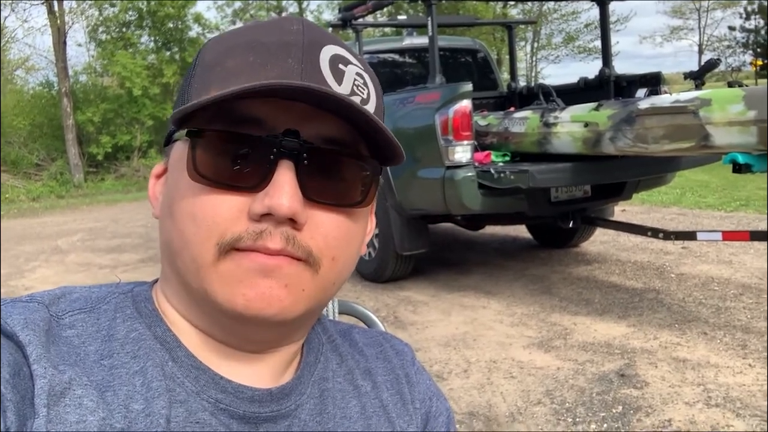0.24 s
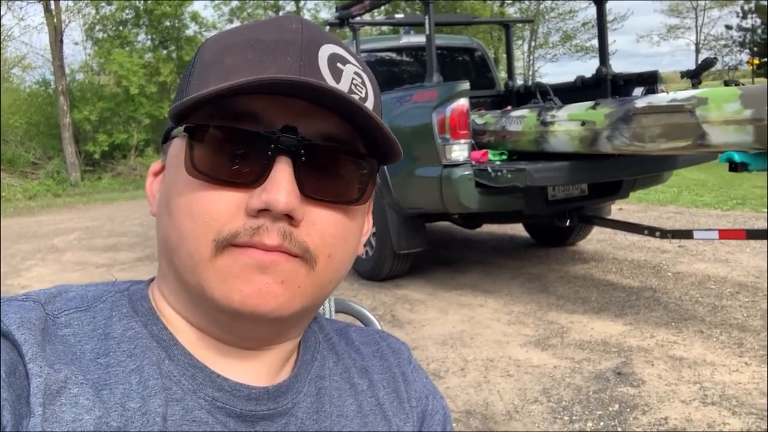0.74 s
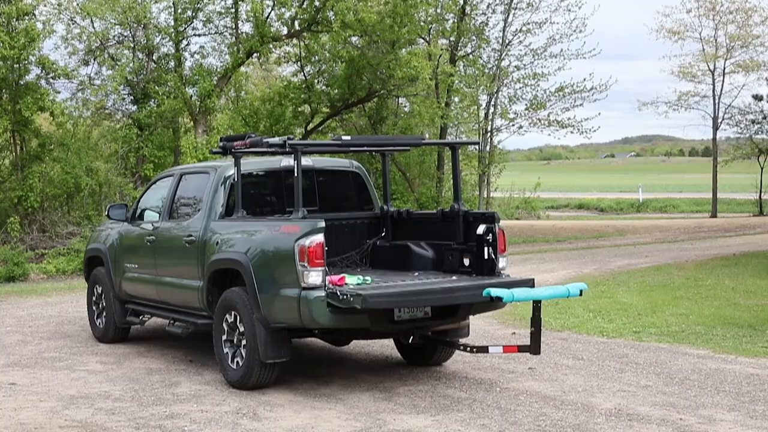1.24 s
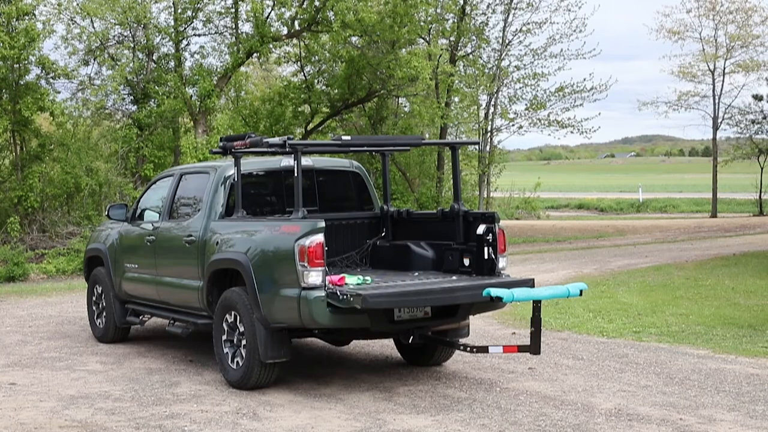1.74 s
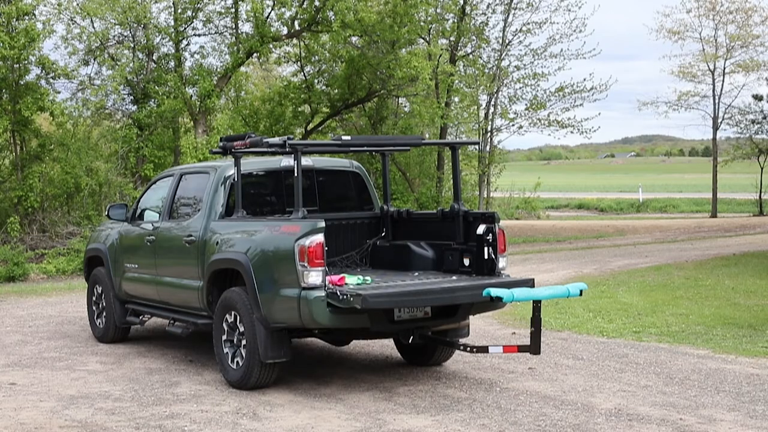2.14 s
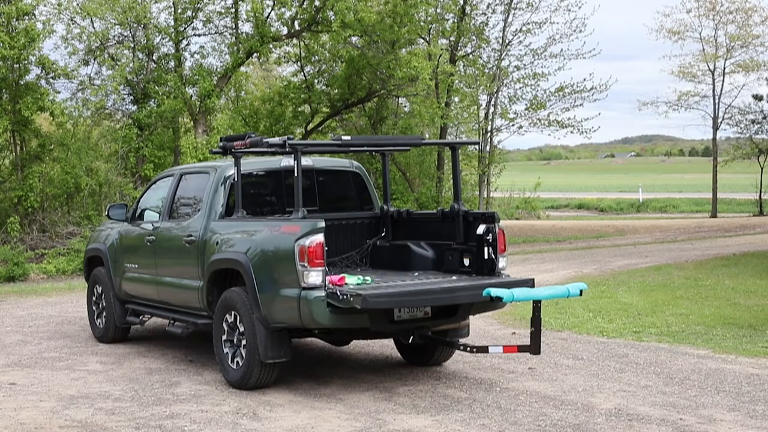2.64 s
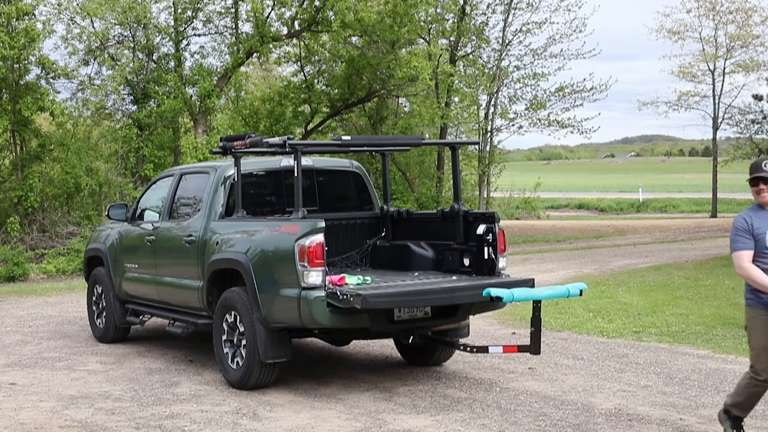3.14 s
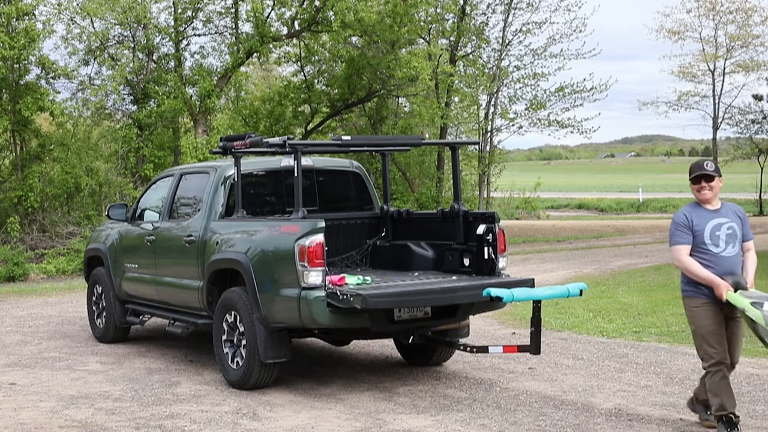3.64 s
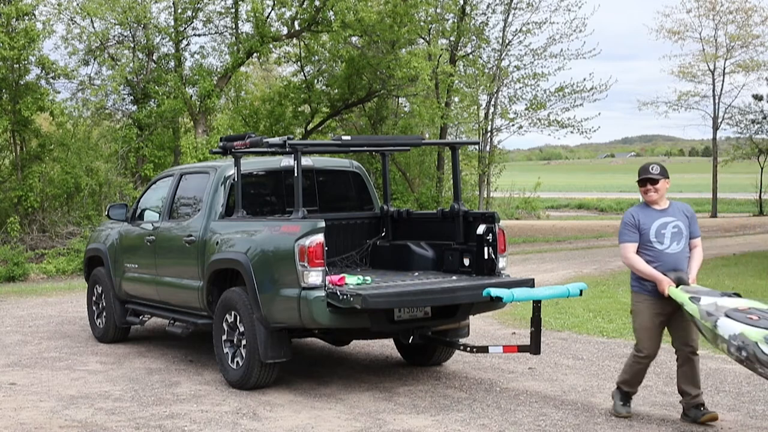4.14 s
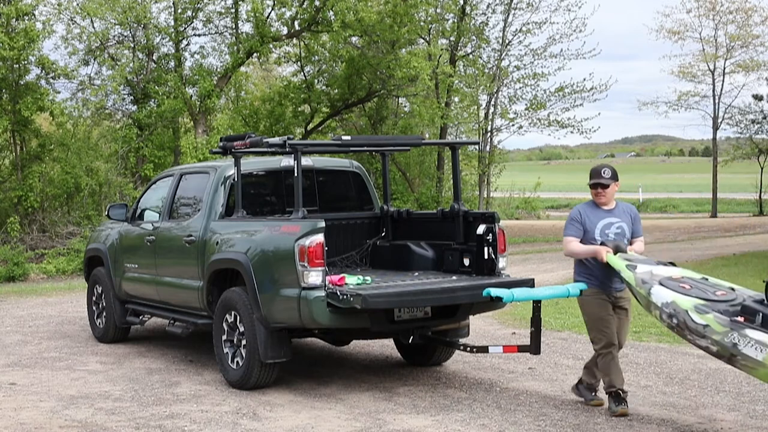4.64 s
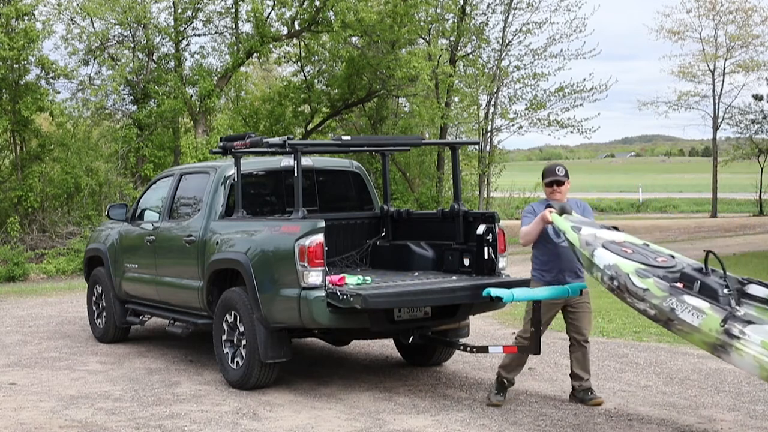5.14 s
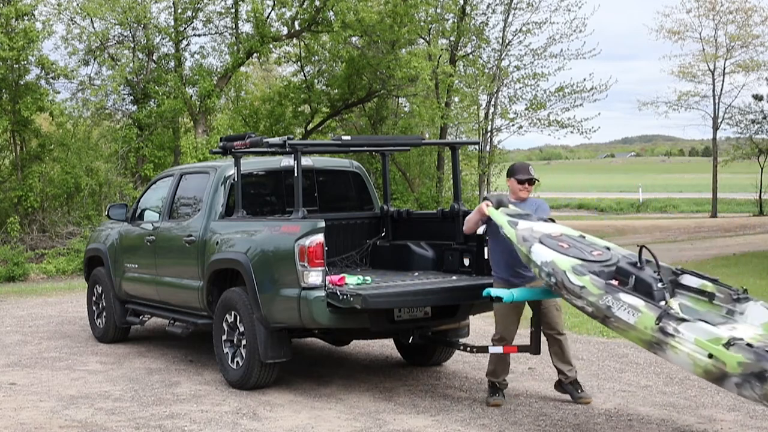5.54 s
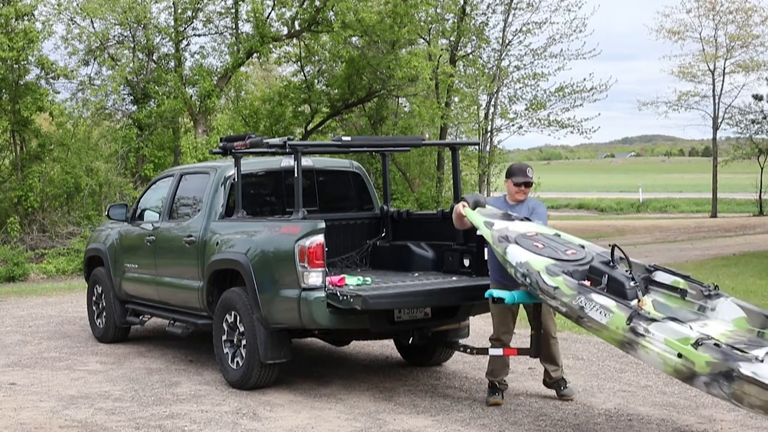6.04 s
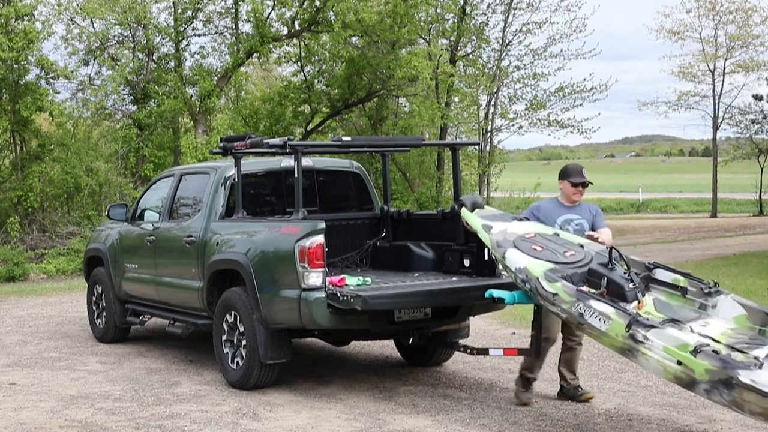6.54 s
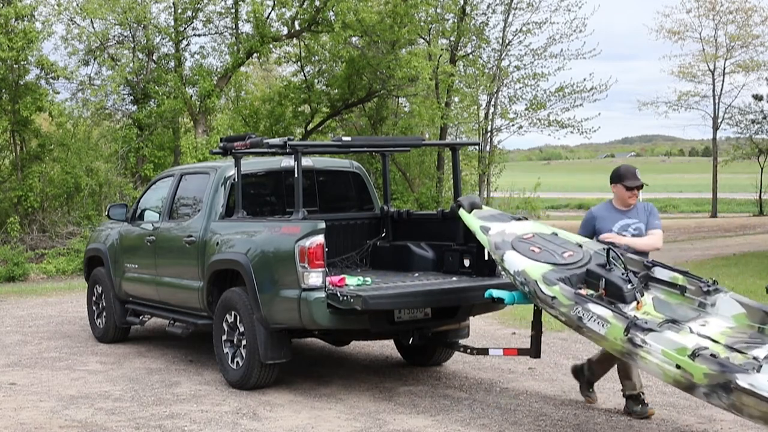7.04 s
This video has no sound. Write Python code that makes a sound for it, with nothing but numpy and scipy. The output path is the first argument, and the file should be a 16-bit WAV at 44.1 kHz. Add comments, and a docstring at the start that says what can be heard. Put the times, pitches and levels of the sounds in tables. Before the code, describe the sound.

From 0 to about 1 s it is very quiet: only a faint, wavering low hum. At 1 s the scene cuts abruptly to an open gravel yard with soft airy background, and a hollow plastic kayak is already being dragged. At first deep boom and dull bumps dominate, with a strong crunch at 1.4 s. The pull surges and slackens; from 2.4 s stones snap more sharply, and from 3.5 to 5.7 s the grinding is dense, loud, bright and close, with brief hull groans near 3.9, 5.0 and 5.65 s and hard cracks at 4.7 and 5.6 s. At 5.7 s the stern skids in a sandy spray, fading by 5.95 s. Then soft shoe scuffs and far, quick bird chirps from 6.2 s. A small click at 6.89 s leads into a hollow double knock at 6.9 and 6.94 s, rattling and bouncing faintly; shoe and bird traces follow to the end.

```python
"""A gravel yard, entered abruptly after a much quieter spot with a low hum: a plastic kayak is dragged bow first.
Grit and stones are random trains of fractures filtered by hull resonances; the hollow hull adds boom and groans.
The stern skids to rest as fading sand noise, shoes shuffle as short bursts of filtered grains, and the bow touches
a truck bed with a click of such grains, then lands in a double knock of decaying modes. A far bird sings in
gliding tones."""
import sys
import numpy as np
from scipy import signal
from scipy.fft import rfft, irfft
from scipy.io import wavfile
from scipy.ndimage import uniform_filter1d

SR = 44100
rng = np.random.default_rng(int(sys.argv[2]) if len(sys.argv) > 2 else 0)


def log_audio(samples):
    """Write samples as a 16-bit WAV file to the path given in sys.argv[1]."""
    # one column per channel
    frames = np.atleast_2d(samples).T
    # limit to full scale, then quantise
    limited = np.clip(frames, -1, 1)
    pcm = np.round(limited * 32767).astype(np.int16)
    wavfile.write(sys.argv[1], SR, pcm)


N = 321930  # samples
T = np.arange(N) / SR  # s
YARD_FROM_S = .972  # the quiet spot ends, the yard begins


def amp(db):
    """Decibel law: level to linear amplitude."""
    return 10 ** (np.asarray(db) / 20)


def evened(x):
    """Normalization to unit root mean square."""
    return x / np.sqrt(np.mean(x ** 2) + 1e-20)


def blow(x):
    """Energy normalization: the energy of 10 ms at unit level."""
    return x * np.sqrt(.01 * SR / (np.sum(x ** 2) + 1e-20))


def read(points, hz):
    """Spectral interpolation on a logarithmic frequency axis."""
    f, value = np.transpose(points)
    return np.interp(np.log(hz + 1), np.log(f + 1), value)


def add(mix, s, sound):
    """Superposition: adds a sound to the mix from time s on."""
    part = mix[round(s * SR):][:len(sound)]
    part += sound[:len(part)]


def wander(hz):
    """Low-pass random process: unit-size noise rolled off steeply above hz."""
    rolloff = 1 + (np.fft.rfftfreq(N, 1 / SR) / hz) ** 4
    return evened(irfft(rfft(rng.standard_normal(N)) / rolloff, N))


def noise(spectrum):
    """Spectral shaping: steady noise of a given colour at unit level."""
    colour = amp(read(spectrum, np.fft.rfftfreq(N, 1 / SR)))
    return evened(irfft(rfft(rng.standard_normal(N)) * colour, N))


def response(spectrum, resonances=(), size=4096):
    """Minimum-phase principle: a causal impulse response from a colour plus resonances (f, width, lift)."""
    hz = abs(np.fft.fftfreq(size, 1 / SR))
    db = read(spectrum, hz)
    db = db + sum(lift / (1 + (2 * (hz - f) / width) ** 2) for f, width, lift in resonances)
    log_spectrum = signal.hilbert(np.log(amp(db))).conj()  # phase follows from the log magnitude
    return np.fft.ifft(np.exp(log_spectrum)).real[:size // 2]


def registers(x):
    """Band splitting at 1200 and 5000 Hz: body, crunch and fizz, each at unit level."""
    hz = np.fft.rfftfreq(len(x), 1 / SR)
    low = 1 / (1 + (hz / 1200) ** 10)
    high = 1 / (1 + (5000 / (hz + 1)) ** 10)
    return [evened(irfft(rfft(x) * share, len(x))) for share in (low, 1 - low - high, high)]


def grains(count, per_s, spread_db):
    """Random impulse train: sparse clicks of either sign, most small and a few large."""
    chance, size, sign = rng.random((3, count))
    steps_up = np.minimum(-np.log(1 - size), 4)
    return (chance < per_s / SR) * np.sign(sign - .5) * amp(spread_db * steps_up)


def scatter(x, t60, wet_db, count=12000):
    """Diffuse reflection: ground, truck and trees return a short, thin exponential tail."""
    t = np.arange(count) / SR
    taps = grains(count, per_s=2600, spread_db=15.0) * amp(-60 * t / t60) * (t > .003)
    return x + amp(wet_db) * signal.oaconvolve(x, taps / np.linalg.norm(taps))[:N]


# noise colour of the quiet spot: (f/Hz, relative density/dB)
QUIET_COLOUR = [(20, 0), (45, -34), (70, 8.5), (100, -10), (150, -12.5), (290, -18.5), (500, -33.5),
                (760, -38), (1500, -44), (4000, -47.5), (16000, -62)]
# noise colour of the open air in the yard: (f/Hz, relative density/dB)
AIR_COLOUR = [(20, -18), (50, 6.5), (110, 8), (200, 1), (450, -4), (1000, -8), (1500, -6.5), (3500, -13),
              (5000, -20.5), (8000, -19.5), (16000, -26)]
# course of the low hum: (t/s, level/dB)
HUM_LEVEL = [(0.0, -49), (0.082, -60), (0.11, -61), (0.15, -52), (0.234, -46), (0.272, -55), (0.39, -46),
             (0.425, -62), (0.46, -55), (0.508, -49), (0.654, -51.5), (0.902, -44.5), (0.96, -56)]
QUIET_DB, AIR_DB, HUM_HZ = -58.5, -50.5, 64.6


def background(drift_hz=5.6):
    """Frequency-modulated tone and coloured noise: a wavering hum in the quiet spot, then the yard's open air."""
    hum = evened(np.sin(2 * np.pi * np.cumsum(HUM_HZ + wander(drift_hz)) / SR))
    hum = hum * amp(np.interp(T, *np.transpose(HUM_LEVEL)))
    quiet = hum + amp(QUIET_DB) * noise(QUIET_COLOUR)
    yard = amp(AIR_DB) * noise(AIR_COLOUR) * amp(wander(9.1))
    return np.where(T < YARD_FROM_S, quiet, yard)


# bird syllables: (t/s, length/s, nominal start f/Hz, nominal end f/Hz, peak level/dB)
SYLLABLES = [(.51, .045, 2500, 3150, -84), (0.587, 0.15, 1200, 1340, -87), (0.887, .065, 2750, 3140, -79),
             (6.17, .026, 3410, 4150, -51.5), (6.247, 0.029, 6000, 3300, -57),
             (6.312, .028, 3350, 4100, -52), (6.395, 0.027, 6100, 3350, -59),
             (6.462, .028, 3300, 4000, -50), (6.534, 0.019, 4100, 2880, -51),
             (6.634, 0.022, 4100, 2900, -49), (6.739, 0.018, 4050, 2900, -51),
             (6.783, .015, 7300, 5500, -51), (7.1, .018, 3760, 3720, -52), (7.126, 0.016, 4100, 2850, -52),
             (7.2, 0.024, 2900, 3360, -54), (7.24, 0.016, 3400, 3630, -63), (7.265, .018, 4220, 2900, -51)]


def bird(waver=0.012, arch_hz=90):
    """Frequency glide: a far songbird slurs near-pure, slightly arched tones up and down."""
    out, unsteady = np.zeros(N), 1 + waver * wander(250)
    for s, length, start_hz, end_hz, db in SYLLABLES:
        u = np.linspace(0, 1, int(length * SR))
        arch = np.sin(np.pi * u)
        hz = start_hz + (end_hz - start_hz) * u + arch_hz * arch
        hz = hz * unsteady[int(s * SR) - len(u):][:len(u)]
        add(out, s, amp(db) * arch * np.sin(2 * np.pi * np.cumsum(hz) / SR))
    return out


# gravel under a rubber sole: (f/Hz, level/dB)
SOLE_COLOUR = [(100, -4), (350, 8.5), (600, 12), (900, 4), (1400, -2), (2100, -1.5), (2700, -4.5),
               (3800, -6.5), (5000, -10), (7500, -9), (11000, -20), (16000, -28)]
# shoes on gravel, and at 6.887 s the click of the bow's first touch on the truck:
# (t/s, crunch level/dB, body re crunch/dB, fizz re crunch/dB, time to peak/s, resonance f/Hz)
SCUFFS_AND_TOUCH = [(6.028, -46.5, 1.5, -9, 0.01, 2260), (6.112, -46, -3, -5, .003, 3040),
                    (6.118, -49, -4, -10, 0.012, 3000), (6.323, -46.5, -13, -15, 0.021, 1750),
                    (6.338, -46, -14, -22, 0.0016, 1670), (6.385, -54, -14, -10, 0.026, 1600),
                    (6.423, -42.5, -9, -22, 0.0024, 1400), (6.458, -41, -12, -19, 0.002, 1900),
                    (6.48, -50.5, -11, -9, 0.013, 1900), (6.664, -47.5, -10, -7, 0.0025, 3300),
                    (6.68, -50, 0, -8, 0.025, 1450), (6.719, -46.5, -8, -6, 0.0054, 3600),
                    (6.765, -43.5, -0.5, -15, 0.0041, 1550), (6.79, -49.5, -3, -15, 0.008, 1550),
                    (6.829, -42, 3.5, -13, 0.003, 2010), (6.846, -45, -8, -17, 0.0027, 1730),
                    (6.857, -38, -9, -17, 0.0024, 3000), (6.8866, -33, -12, -21, .0007, 2000),
                    (7.03, -44.5, -11, -17, 0.023, 2200)]


def steps_and_first_touch(resonance_db=8, resonance_width=0.61, count=18000):
    """Granular friction: soles scuff gravel and click stones; one such burst is the bow's first touch on the truck."""
    out, t = np.zeros(N), np.arange(count) / SR
    for s, db, body_db, fizz_db, peak_s, hz in SCUFFS_AND_TOUCH:
        colour = response(SOLE_COLOUR, [(hz, resonance_width * hz, resonance_db)])
        clicks = grains(count, per_s=2600, spread_db=4.5)
        parts = registers(signal.fftconvolve(clicks, colour)[:count])
        u = t / peak_s
        burst = sum(p * amp(db + tilt) for p, tilt in zip(parts, (body_db, 0, fizz_db)))
        add(out, s, u * np.exp(1 - u) * burst)
    return out


# modes of the bow on the truck bed: (nominal f/Hz, relative level/dB, 60 dB decay as share of ring length)
BOW_MODES = [(227, -9, 0.94), (328, -9.5, 2.1), (371.5, -2.5, 1.8), (403, -6.5, 1.1), (510, -4, 0.4),
             (575, 2, 0.54), (617, 3, 0.65), (677, -6, 0.58), (830, 0, 0.39), (920, -22, 0.37),
             (1406, -16, 0.86), (1470, -14, 0.57), (1880, -13, .4), (2800, -11, .3)]
# crack of plastic on the truck: (f/Hz, level/dB)
CRACK_COLOUR = [(200, -17), (700, 5.5), (900, -1), (1020, -9), (1250, -4), (1500, -1), (2100, 1),
                (2800, -2), (3600, -6.5), (4300, -7), (5100, -14), (7400, -11.5), (9000, -14.5),
                (15000, -21)]
# blows on the truck: the bow's landings and bounces, and fainter rattling knocks among them: (t/s, ring level
# over 10 ms/dB, crack re ring/dB, ring length/s), before the high-pass
KNOCKS_AND_RATTLES = [(6.8977, -19, -5.5, 0.066), (6.9136, -27, -7, .1), (6.928, -32, -9, 0.064),
                      (6.9352, -15.5, -9.5, 0.09), (6.954, -35, -15, 0.06), (6.9644, -29, -24, 0.08),
                      (6.983, -41, -12, 0.054), (7.04, -34.5, -10, 0.065), (7.0655, -34.5, -10.5, 0.1),
                      (7.092, -44, -10, 0.074)]


def knocks(crack_s=0.0012, rattle_db=-26, rattle_s=0.057, travel_s=0.0013, detune=.012,
           chatter_db=2.5, chatter_hz=80, punch_db=2, punch_s=0.011, count=12000):
    """Modal impact: the bow lands and bounces amid fainter rattling knocks, each a crack, a chattering hollow
    ring and a rattle of fittings."""
    out, t, colour = np.zeros(N), np.arange(count) / SR, response(CRACK_COLOUR)
    hz, level, share = np.transpose(BOW_MODES)[:, :, None]
    chatter = amp(chatter_db * wander(chatter_hz))
    for s, db, crack_db, ring_s in KNOCKS_AND_RATTLES:
        shifted = hz * (1 + detune * rng.uniform(-1.1, 1, hz.shape))
        phase = rng.uniform(-1, 1, hz.shape)
        modes = amp(level - 60 * t / (share * ring_s)) * np.sin(2 * np.pi * shifted * t + phase)
        ring = modes.sum(0) * (1 - np.exp(-(t / travel_s) ** 2))  # bending waves take a moment to spread
        ring = ring * np.resize(chatter[round(s * SR):], count)
        ring = ring * amp(punch_db * np.exp(-t / punch_s))  # boosted at the contact
        decay = np.exp(-t / crack_s) + amp(rattle_db) * np.exp(-t / rattle_s)
        crunch = grains(count, per_s=8700, spread_db=1.0) * decay
        crack = blow(signal.fftconvolve(crunch, colour)[:count])
        add(out, s, amp(db) * (blow(ring) + amp(crack_db) * crack))
    return signal.sosfilt(signal.butter(2, 200, "high", fs=SR, output="sos"), out)


# sand under the sliding stern: (f/Hz, level/dB)
SAND_COLOUR = [(100, -0.5), (400, 4), (490, 10), (720, 0), (950, 3.5), (1150, 0), (1500, -6), (2250, 1.5),
               (2700, -6.5), (3200, -1.5), (4200, -14.5), (7500, -19), (10000, -23.5), (13000, -35),
               (16000, -42)]
SKID_S, SKID_STOP_S, SKID_RISE_S = 5.705, 5.925, 0.004
SKID_EASE_DB_PER_S, SKID_STOP_DB_PER_S = 61, 200  # the second adds to the first once the stern stops


def skid(level_db=-23.5, body_db=-6.5, fizz_db=-13, spray_db=11, spray_s=0.053,
         trickle_db=-53, trickle_db_per_s=20):
    """Sliding friction: the stern slews sideways in a bright spray of sand, stops, and the last grains trickle."""
    age = np.maximum(T - SKID_S, 0)
    stopped = np.maximum(T - SKID_STOP_S, 0)
    slide = amp(level_db - SKID_EASE_DB_PER_S * age - SKID_STOP_DB_PER_S * stopped)
    trickle = amp(trickle_db - trickle_db_per_s * age)
    level = np.minimum(age / SKID_RISE_S, 1) * np.hypot(slide, trickle)
    clicks = grains(N, per_s=6000, spread_db=2.0)
    body, crunch, fizz = registers(signal.oaconvolve(clicks, response(SAND_COLOUR))[:N])
    spray = amp(fizz_db + spray_db * np.exp(-age / spray_s))
    return level * (amp(body_db) * body + crunch + spray * fizz)


# pull on the stern, surging and slackening with the walk: (t/s, effort/dB)
PULL_EFFORT = [(.97, -17), (1.15, -4), (1.29, -4.5), (1.43, 6), (1.64, -5.5), (1.79, 1.5), (1.94, -1),
               (2.14, 1.5), (2.3, -3), (2.45, 1), (2.58, -3.5), (2.92, -3.5), (3.1, 1.5), (3.3, -1.5),
               (3.55, -1.5), (3.63, 3.5), (3.8, 0.5), (4.32, 1), (4.55, 2.5), (4.64, -6.5), (4.73, -1),
               (5.41, -2.5), (5.57, 0), (5.7, -4.5)]
# laws of the registers: (level at the yard's start and 0 dB effort/dB, growth/(dB/s), gain/(dB per dB of effort))
BODY = (-39, -0.2, 0.95)
CRUNCH = (-50, 2.82, 1.34)
FIZZ = (-64.5, 3.77, 0.98)


def drag_db(s, law):
    """Linear level law: each register follows the pull; crunch and fizz grow as the stern nears."""
    start_db, db_per_s, follow = law
    effort_db = np.interp(s, *np.transpose(PULL_EFFORT), left=-150)
    return start_db + db_per_s * (s - YARD_FROM_S) + follow * effort_db


# low boom of the hull: (f/Hz, level/dB)
BOOM_COLOUR = [(20, -14), (31, -25), (45, -4), (62, -8), (85, 0.5), (108, 2.5), (135, -1.5), (180, -2.5),
               (220, 1), (270, -3), (330, -5.5), (400, -7), (520, -30), (1200, -62)]
# level law of the boom: (level at start/dB, growth/(dB/s), gain/(dB per dB of effort))
BOOM_FOLLOW = (-31, -0.58, 1)
# bumps from the ground or handling: (t/s, peak level before the thud and ring gains/dB, nominal panel f/Hz)
HULL_BUMPS = [(1.15, -28.5, 192), (1.332, -28, 290), (1.417, -19, 179), (1.434, -17, 249.3),
              (1.704, -25, 114), (1.803, -22.5, 253.4), (1.982, -32, 303), (2.075, -28.5, 312),
              (2.109, -23.5, 120), (2.175, -26, 185), (2.403, -27, 120), (2.743, -30, 109),
              (3.098, -24.5, 241), (3.157, -27.5, 374), (3.236, -27.5, 300), (3.391, -25.5, 325),
              (3.444, -25, 265), (3.671, -21.5, 250), (3.78, -28, 301), (4.089, -24, 226), (4.17, -33, 238),
              (4.238, -34, 110), (4.369, -24.5, 356), (4.482, -28, 291), (4.613, -25.5, 259),
              (4.695, -21, 113), (4.769, -26.5, 252), (5, -30, 236), (5.099, -34, 152), (5.448, -25.5, 215),
              (5.607, -25, 369), (6.725, -40, 201), (6.752, -37, 166)]
BUMP_RISE_S = 0.012  # time for the boom to swell after a bump


def rumble(lump_db=1.2, lump_hz=27, thud_db=-4.0, ring_db=-3.5, glide=0.09, rest_s=5.82,
           fade_db_per_s=100, deep_hz=55, deep_db=5.0, deep_db_per_s=-3.0):
    """Forced cavity resonance: the hull booms with the pull, bumps ring panels, the deepest boom fades as it lifts."""
    fade_db = fade_db_per_s * np.maximum(T - rest_s, 0)
    power = amp(drag_db(T, BOOM_FOLLOW) + lump_db * wander(lump_hz) - fade_db) ** 2
    rings, t = np.zeros(N), np.arange(SR // 4) / SR
    u = t / BUMP_RISE_S
    for s, db, hz in HULL_BUMPS:
        shape = amp(db) * u * np.exp(1 - u)
        add(power, s, (amp(thud_db) * shape) ** 2)
        falling_hz = hz * (1 + glide * (np.exp(-u / 2) - .5))
        turns = np.cumsum(falling_hz) / SR + rng.random()
        add(rings, s, amp(ring_db) * shape * np.sqrt(2) * np.sin(2 * np.pi * turns))
    boom = noise(BOOM_COLOUR)
    deep = irfft(rfft(boom) / (1 + (np.fft.rfftfreq(N, 1 / SR) / deep_hz) ** 10), N)
    deep_gain = amp(deep_db + deep_db_per_s * (T - YARD_FROM_S))
    return (boom + deep * (deep_gain - 1)) * np.sqrt(power) + rings


# groans of the hull: (t/s, length/s, middle f/Hz, peak level of the fundamental/dB)
HULL_GROANS = [(3.904, 0.019, 364, -26), (4.976, 0.025, 342, -26.5), (5.649, 0.027, 376, -24)]


def groans(sag=0.054, overtone_db=-10, count=3):
    """Stick-slip oscillation: the plastic groans for a few cycles, three harmonics sagging in pitch."""
    out = np.zeros(N)
    for s, length, hz, db in HULL_GROANS:
        u = np.linspace(0, 1, int(length * SR))
        phase = 2 * np.pi * np.cumsum(hz * (1 + sag * (.5 - u))) / SR
        tone = sum(amp(overtone_db * k) * np.sin((k + 1) * phase) for k in range(count))
        add(out, s, amp(db) * np.sqrt(abs(np.sin(np.pi * u))) * tone)
    return out


def grit(per_s=130, spread_db=3.0, over_db=-2.5, db_per_s=-1.0, low_hz=1500, high_hz=9500,
         tilt_db=-18, cycles=3.6, count=30):
    """Damped oscillation: loose grit ticks stone on stone at thirty pitches, the higher the fainter."""
    out, t = np.zeros(N), np.arange(SR // 100) / SR
    for place in np.linspace(0, 1, count):
        turns = low_hz * (high_hz / low_hz) ** place * t
        tick = np.exp(-turns / cycles) * (1 - np.exp(-2 * turns)) * np.sin(2 * np.pi * turns)
        clicks = grains(N, per_s / count, spread_db)
        out += amp(tilt_db * place) * signal.oaconvolve(clicks, evened(tick))[:N]
    level_db = drag_db(T, CRUNCH) + over_db + db_per_s * (T - YARD_FROM_S)
    return evened(out) * amp(level_db) * (T < SKID_S)


# colour of a stone's push on the hull: (f/Hz, level/dB)
PUSH_COLOUR = [(35, -42), (120, -1), (350, -1.5), (600, 0.5), (930, -2.5), (1180, -4.5), (1650, 0.5),
               (2500, 7.5), (3200, 4), (3700, -4.5), (5600, -16), (8300, -16.5), (10000, -25),
               (12000, -28.5), (16000, -38)]
# resonances and hollows of the hull: (nominal f/Hz, width/Hz, lift at full load/dB)
HULL_MODES = [(363, 76, 4), (503, 240, -7.5), (678, 170, 2), (748, 123, 7.5), (1130, 370, -4.5),
              (1904, 160, 11.5), (2280, 86, 2), (2360, 190, 6), (3080, 350, 6.5), (4160, 650, 6.5),
              (4900, 98, 7), (6880, 780, 3.5), (10200, 170, 9)]
# weight on the stern as the bow is raised, bringing out the resonances: (t/s, share, pitch factor of low modes)
STERN_LOAD = [(1, 0.4, 1.39), (2.1, 0.4, 1.19), (3.2, 0.72, 1.46), (3.8, 0.9, 1.17), (4.2, 0.9, 0.954),
              (4.7, 0.85, 0.86), (5.7, 0.64, 0.83)]


def contact(s, ring_hz, tick_hz, detune=0.035, ring_width_hz=300, tick_width_hz=900, count=5):
    """Driving-point response: shifted hull modes, one ringing panel, the stone's tick and random tints."""
    uneven_db, tint_db, tint_width, ring_db, tick_db = 3.5, 6, .15, 8, 7.5
    times, *columns = np.transpose(STERN_LOAD)
    load, stiffness = (np.interp(s, times, c) for c in columns)
    hz, width, lift = np.transpose(HULL_MODES)
    higher, louder = rng.uniform(-1.18, 1, (2, len(hz)))
    low_panel = (hz > 430) & (hz < 1000)  # only these modes change pitch with the load
    hz = hz * np.where(low_panel, stiffness, 1) * (1 + detune * higher)
    modes = [*zip(hz, width, load * lift + uneven_db * louder)]
    modes += [(ring_hz, ring_width_hz, ring_db), (tick_hz, tick_width_hz, tick_db)]
    places = np.geomspace(450, 8000, count) * rng.uniform(.7, 1.4, count)
    tints = [(f, tint_width * f, tint_db * rng.uniform(-1.22, 1)) for f in places]
    ring = response(PUSH_COLOUR, modes + tints)
    return ring / np.linalg.norm(ring)


def chance_pitches(count):
    """Log-uniform distribution: rows (panel ring/Hz, stone tick/Hz) for contacts anywhere under the stern."""
    low, high = np.array([1400, 4500]), np.array([3800, 10000])
    return low * (high / low) ** rng.random((count, 2))


def pebbles(spread_db=0.5, body_db=4.0, length_s=0.0043, count=80):
    """Jittered point process: small stones pop at random pitches at the grinding's level; rows as for stones."""
    when, size, dull = rng.random((count, 3)).T
    s = YARD_FROM_S + (SKID_S - YARD_FROM_S) * (np.arange(count) + when) / count
    body, crunch, fizz = (drag_db(s, law) for law in (BODY, CRUNCH, FIZZ))
    level = crunch + spread_db * (2 * size - 1)
    body_tilt = body - crunch + body_db + spread_db * (2 * dull - 1)
    lengths = np.full(count, length_s)
    return list(zip(s, level, body_tilt, fizz - crunch, lengths, *chance_pitches(count).T))


# larger stones snapping from under the hull: (t/s, crunch level over 10 ms/dB, body re crunch before body_db/dB,
# fizz re crunch/dB, time scale of the snap/s, panel ring f/Hz, stone tick f/Hz)
SNAPPING_STONES = [(1.116, -42.5, 9.5, -6, 0.018, 1860.0, 6900),
                   (1.256, -50.5, 18.5, -23.0, 0.0048, 1890, 6420.0),
                   (1.283, -42, -6, -12, 0.014, 1790, 7300.0), (1.361, -48, 8, -15, .011, 1950, 7000),
                   (1.4103, -27, 6.5, -23, 0.01, 1900, 6960.0), (1.427, -34, 1, -23, 0.0091, 1600, 7200),
                   (1.444, -29.5, -4, -16, 0.0087, 2390, 7300), (1.473, -46, -6, -5, .004, 2700, 8200),
                   (1.502, -38.5, 9, -15, 0.021, 2260.0, 4470.0), (1.572, -52, 16, -17, .008, 1950, 7200),
                   (1.59, -42.5, 14, -11, 0.014, 2610.0, 7530.0),
                   (1.619, -45.5, 8, -5, 0.013, 2220.0, 6940.0), (1.74, -48, 13, -14, .01, 1950, 7000),
                   (1.765, -43, 3, -6, 0.015, 2700, 7500), (1.801, -38, 5, -18.0, 0.012, 1770, 4550),
                   (1.838, -44, 14, -22, 0.01, 3430, 4210.0), (1.921, -48.5, 20, -14, 0.01, 2000, 7200),
                   (1.9856, -36.5, 12.5, -11, 0.014, 1800, 8400),
                   (2.075, -41, 21, -12, 0.011, 1890, 8730.0),
                   (2.107, -39.5, 17, -8, 0.013, 1840.0, 7630.0),
                   (2.1415, -34.5, 13, -12, 0.014, 1830, 6900), (2.173, -39.5, 7, -8, 0.0054, 1940, 8300),
                   (2.201, -46.5, 1, -1, 0.0043, 2940.0, 7010.0),
                   (2.2635, -36, -5.0, -12, 0.019, 2000, 6800.0), (2.381, -43, 13, -11, 0.0079, 1950, 8400),
                   (2.392, -42, 7, -10, .005, 2700, 7600), (2.43, -36, 11, -12, 0.0085, 1950, 7300),
                   (2.4417, -25.5, 0, -17, 0.0036, 2000, 7500), (2.507, -43, -6, -14, 0.0037, 2400, 7200),
                   (2.534, -31, 1.5, -27, 0.0021, 2690, 7270.0),
                   (2.585, -39.5, -5, -13, 0.0051, 3260.0, 6900),
                   (2.6075, -40.5, -8, -10, 0.0047, 3260.0, 7860.0),
                   (2.6669, -28, 1, -10.5, 0.0016, 2720, 7850), (2.754, -37, 6, -13, 0.00051, 1810.0, 4200),
                   (2.7806, -34.5, 1.5, -17, 0.0049, 2020, 7780.0),
                   (2.812, -36, 3, -11, 0.0098, 1830, 8600),
                   (2.937, -24.5, -7.5, -17.5, 0.0085, 1940, 8650),
                   (2.9705, -37, -17, -13, 0.0067, 1900, 7220.0),
                   (2.994, -34.5, -13, -13, 0.0041, 1940, 8460.0),
                   (3.0524, -30, -3, -10.5, 0.013, 1890, 7200),
                   (3.0718, -28.5, -3, -13, 0.007, 3140, 7160.0), (3.1012, -26, -1, -16, 0.003, 2450, 7300),
                   (3.1306, -34.5, -3, -13, 0.0084, 1890.0, 7050.0),
                   (3.155, -35.5, 8, -15, 0.0083, 1920, 6300), (3.225, -29, -6, -19.0, 0.006, 2410, 4970),
                   (3.241, -24.5, 2, -14.5, 0.0029, 2540, 7250.0),
                   (3.266, -37, -6, -12, 0.012, 2480, 7270.0), (3.346, -41, -4, -15, .004, 2400, 7200),
                   (3.4009, -47.5, 16.5, 4, 0.001, 2070.0, 7340),
                   (3.435, -26.5, 2.5, -17.5, 0.0031, 2010, 6190.0),
                   (3.452, -28, 2.0, -18, 0.0064, 2520, 4150), (3.511, -44, -5, -18, 0.0032, 3080, 7200),
                   (3.5467, -29, -3.0, -7.5, 0.0043, 2530, 8500),
                   (3.5816, -29, -1, -9.5, 0.0066, 2540, 8340), (3.601, -27.5, -2, -18, 0.0074, 1910, 7200),
                   (3.615, -27.5, 3, -9, 0.0035, 1930, 6600), (3.631, -26.5, 1.5, -8.5, 0.01, 2440, 6430.0),
                   (3.6628, -25.5, 1, -5.5, 0.015, 2360, 6000), (3.722, -40, 6, -8, .008, 2400, 7200),
                   (3.741, -27.5, 2, -9, 0.003, 3330, 7350), (3.785, -24.5, -2.5, -9, 0.0087, 3170, 7060),
                   (3.83, -34, -7, -12, 0.0057, 2470, 7200), (3.86, -29, -2, -21, 0.0082, 1880, 4240),
                   (3.885, -29, 3, -15, 0.0087, 2270.0, 4430), (3.934, -28, -1, -9, 0.017, 2230, 7550),
                   (3.955, -36, 5, -6, 0.013, 1930, 7200), (3.984, -36.5, -14, -6, 0.003, 2670.0, 6180.0),
                   (4.004, -41, 4, -4, 0.0058, 2400, 7200), (4.025, -33, -4, -14, 0.0055, 1930, 7000),
                   (4.09, -28.5, 5.5, -13.5, 0.002, 3090.0, 8100),
                   (4.126, -24, -0.5, -7, 0.0081, 2590.0, 7500.0),
                   (4.1445, -28.5, -3, -2.5, 0.0064, 2570, 7440.0),
                   (4.1681, -27.5, 3, -9, 0.002, 2600, 6030.0), (4.175, -17, -3, -13.5, 0.0031, 3240, 7800),
                   (4.204, -41, -4, -9, 0.0037, 2600, 7000), (4.242, -25, 1.5, -8.5, 0.0083, 2600, 6950),
                   (4.261, -32.5, 7, -8, 0.0071, 2250.0, 5350.0),
                   (4.283, -33.5, -4, -3, 0.0034, 2600, 7000), (4.302, -21, -5, -14, 0.0087, 3050, 4300),
                   (4.3297, -24.5, 5, -7.5, 0.011, 2660, 7000), (4.38, -24, -6, -8.5, 0.0071, 2020, 7260),
                   (4.4643, -18.5, -5.5, -9, 0.0029, 1900, 7060),
                   (4.488, -27.5, -4, 6.5, 0.0027, 2970, 7200), (4.4917, -26.5, -2, -6, 0.0062, 3000, 6960),
                   (4.515, -26.5, 1, -7.5, 0.0043, 1960, 6980.0),
                   (4.5408, -22.5, -2, -10.5, 0.0054, 2380, 7700),
                   (4.568, -28, -2.5, -11, 0.0022, 1880, 6800),
                   (4.607, -31.5, -1, -14.0, 0.015, 1800, 6230.0), (4.658, -37, -8, -5, .002, 2400, 7000),
                   (4.6812, -22, -2.5, -6, 0.0074, 2300, 6960.0), (4.728, -26, 0.5, -6, 0.0025, 2700, 6900),
                   (4.7328, -12.5, -7, -11.5, 0.0026, 2320, 4770),
                   (4.762, -27.5, -5, -17, 0.0045, 2330, 7110.0), (4.774, -37, -7, -5, .003, 2300, 7000),
                   (4.806, -32, -2, -3.5, 0.0087, 2310.0, 7200), (4.862, -29, 0, -12, 0.0056, 2890.0, 6040),
                   (4.904, -31.5, -2, -3, 0.0061, 2230, 6990.0), (4.919, -26, -2, -10, 0.0057, 2380, 7000),
                   (4.938, -17, -7, -13, 0.011, 2240, 6860), (4.975, -25.5, -3, -2, 0.0029, 2250, 6850),
                   (5.015, -33, -8, -7, .003, 2300, 7000), (5.039, -25, -3.5, -10.5, 0.0041, 2200.0, 7560),
                   (5.0803, -20, -1, -7.5, 0.01, 2230, 8150),
                   (5.0918, -29.5, 4.5, -4.5, 0.015, 2960, 7660.0), (5.19, -44, -5, 0, 0.0024, 2300, 7000),
                   (5.2024, -30, -3, -5, 0.0088, 2360, 7160),
                   (5.2247, -25.5, 2.5, -18, 0.013, 2300, 7180.0), (5.235, -35, 1, -2, .004, 2300, 7000),
                   (5.254, -38.5, 2, 2.5, 0.012, 2390.0, 6900), (5.289, -35, -2, -2, 0.0022, 2270.0, 6860),
                   (5.308, -25, -4, -7, 0.0078, 2490, 6940.0), (5.3284, -28, -7, -6, 0.0072, 2350, 6800),
                   (5.434, -33, 2, -15, 0.0088, 2300, 7000), (5.452, -23.5, -3, -6.5, 0.0053, 2410, 7150),
                   (5.501, -31.5, 0, -10, .007, 2300, 6900),
                   (5.535, -23.5, -2.5, -11.5, 0.0065, 2280, 6330.0),
                   (5.553, -27, 2, -19, .016, 1880, 6900), (5.578, -26.5, -2.5, -20, 0.007, 2350, 6910.0),
                   (5.584, -33.5, 2, -4, 0.008, 2450.0, 6900), (5.594, -32, 4, -3, 0.0045, 2400, 6700),
                   (5.611, -14, -7.5, -5.5, 0.0027, 2320, 6900), (5.617, -17.5, -3, -9, 0.0046, 2280, 7040),
                   (5.674, -27.5, -8, -13, 0.003, 2380, 5400)]


def stones(rise=0.26, body_db=-1.0, strain_db=-13, strain_share=0.48,
           crumble_db=-22, crumble_s=0.014, count=3200):
    """Brittle fracture: each stone grates as load builds, lets go in a burst of tiny cracks, then crumbles."""
    out, t = np.zeros(N), (np.arange(count) - count // 4) / SR
    for s, db, body, fizz, length, ring_hz, tick_hz in list(SNAPPING_STONES) + pebbles():
        u = np.maximum(t, 0) / (rise * length)
        strain = amp(strain_db) * np.exp(-abs(t) / (strain_share * length))
        crumble = amp(crumble_db) * np.exp(-abs(t) / crumble_s)
        envelope = (u / 2) ** 2 * np.exp(2 - u) + np.where(t < 0, strain, crumble)
        burst = grains(count, per_s=13000, spread_db=3.5) * envelope
        parts = registers(signal.fftconvolve(burst, contact(s, ring_hz, tick_hz)))
        tilts = (body + body_db, 0, fizz)
        add(out, s + t[0], sum(blow(p) * amp(db + tilt) for p, tilt in zip(parts, tilts)))
    return out


def grinding(clump_db=2.5, clump_hz=80, surge_db=0.8, surge_hz=30):
    """Stick-slip excitation: grit cracks in clumps as the keel catches and slips over ever new patches of stones."""
    clicks = grains(N, per_s=850, spread_db=1.2) * amp(clump_db * np.clip(wander(clump_hz), -2, 2))
    clicks /= np.sqrt(uniform_filter1d(clicks ** 2, size=4400) + 1e-9)  # steady pull shared among the clumps
    out, hop = np.zeros(N), 1800  # a new contact every 41 ms, cross-faded
    for at in range(int(YARD_FROM_S * SR) - hop, int(SKID_S * SR), hop):
        patch = clicks[at:at + 2 * hop] * signal.windows.cosine(2 * hop)
        ring = contact(at / SR, *chance_pitches(count=1)[0])
        add(out, at / SR, signal.fftconvolve(patch, ring))
    ground = sum(p * amp(drag_db(T, law)) for p, law in zip(registers(out), (BODY, CRUNCH, FIZZ)))
    return ground * amp(surge_db * wander(surge_hz)) * (T < SKID_S)


def scene():
    """Superposition: kayak, shoes, the bow on the truck and bird over the background."""
    yard_t60, truck_t60 = .18, .13  # s
    dragging = grinding() + grit() + stones() + groans()
    yard = scatter(dragging + skid() + steps_and_first_touch(), yard_t60, wet_db=-11.5)
    landing = scatter(knocks(), truck_t60, wet_db=-9.5)
    song = scatter(bird(), yard_t60, wet_db=-4)
    return (yard + landing + rumble() + song + background())[None]


def record(dry):
    """Amplitude and band limitation: a full-scale clip, then a 16.1 kHz low-pass."""
    band = signal.firwin(511, 16100, window=("kaiser", 9), fs=SR)
    return signal.oaconvolve(np.clip(dry, -1, 1), band[None], "same")


dry = scene()
out = record(dry)
log_audio(out)
```